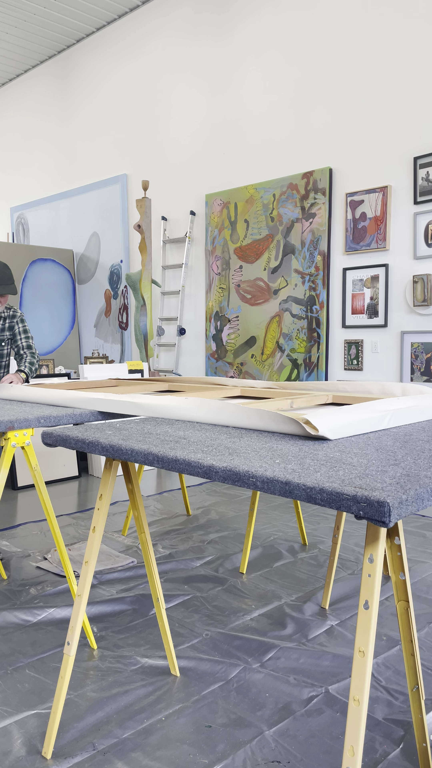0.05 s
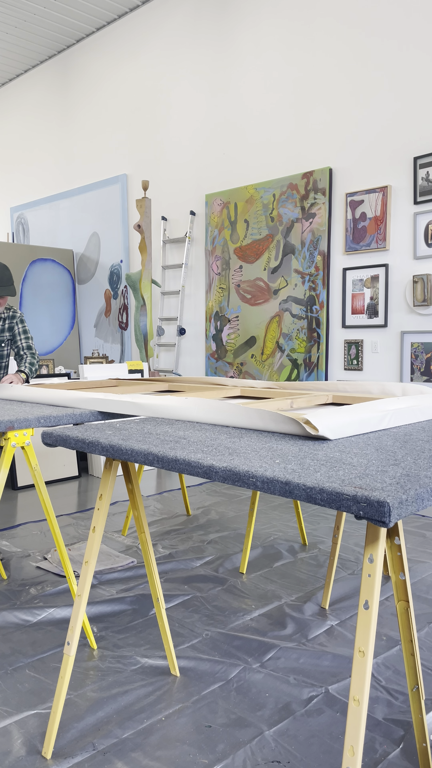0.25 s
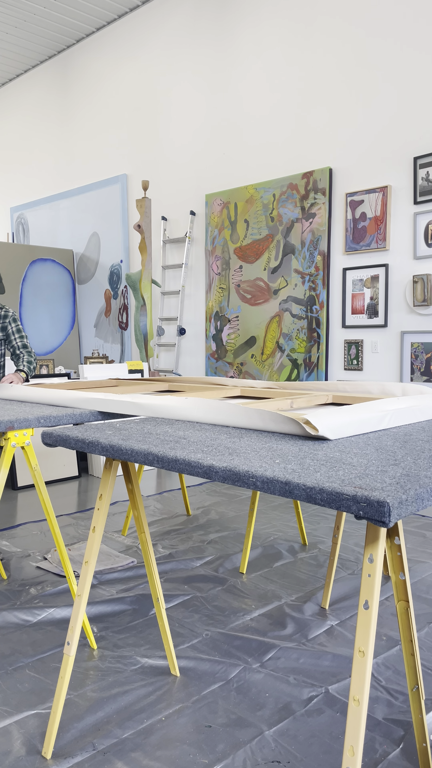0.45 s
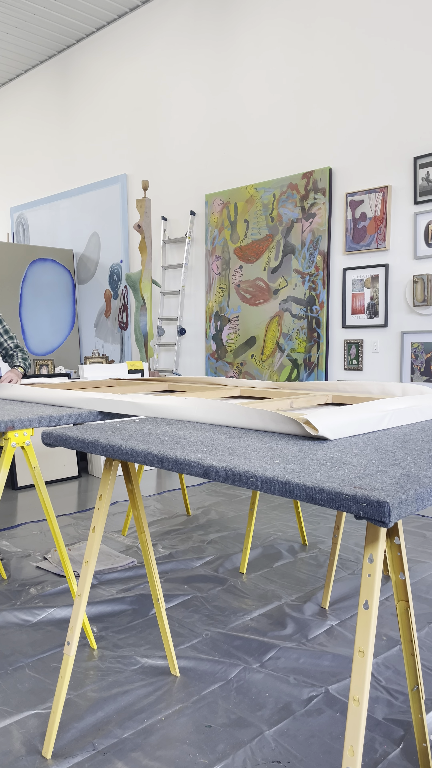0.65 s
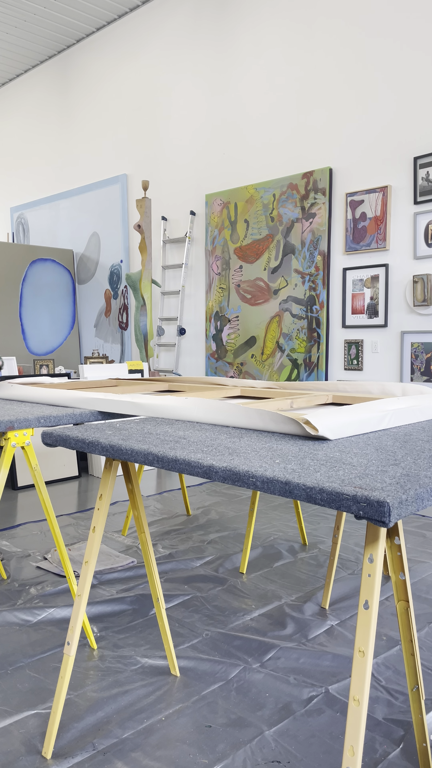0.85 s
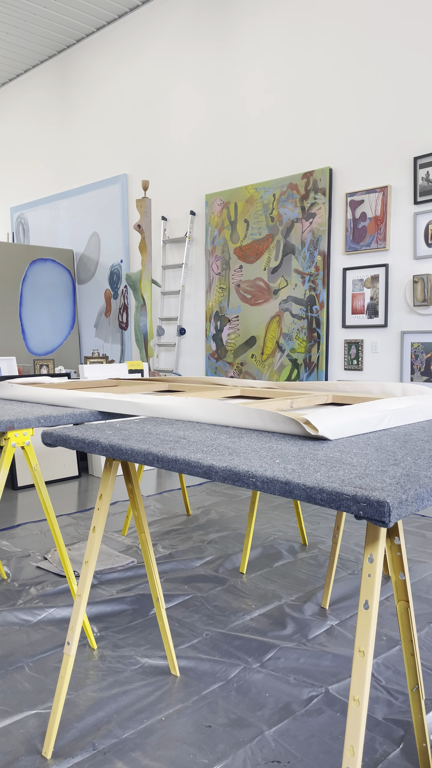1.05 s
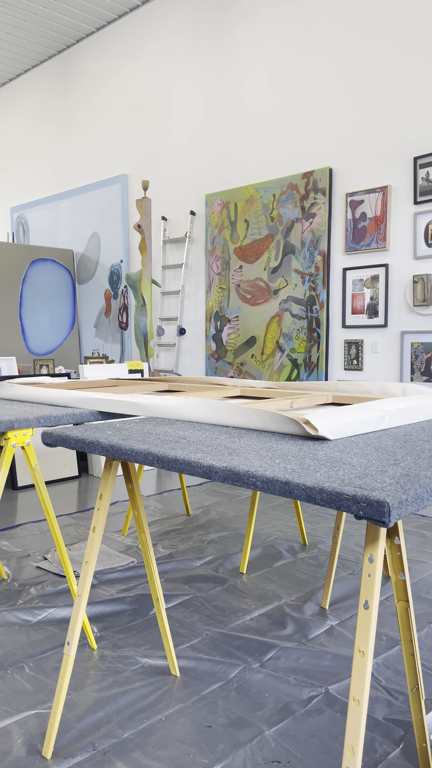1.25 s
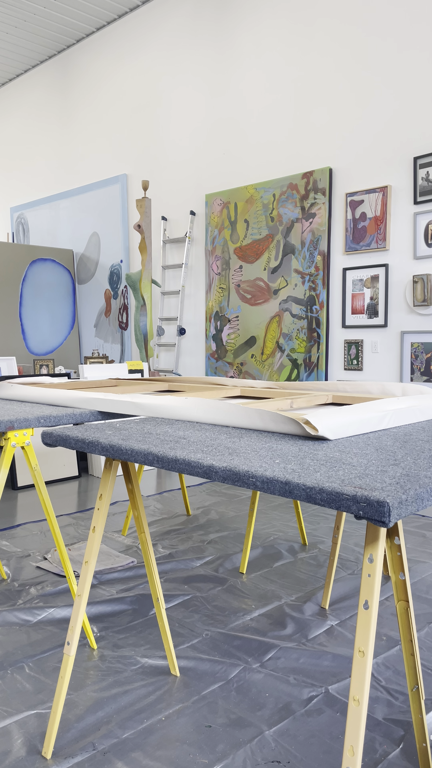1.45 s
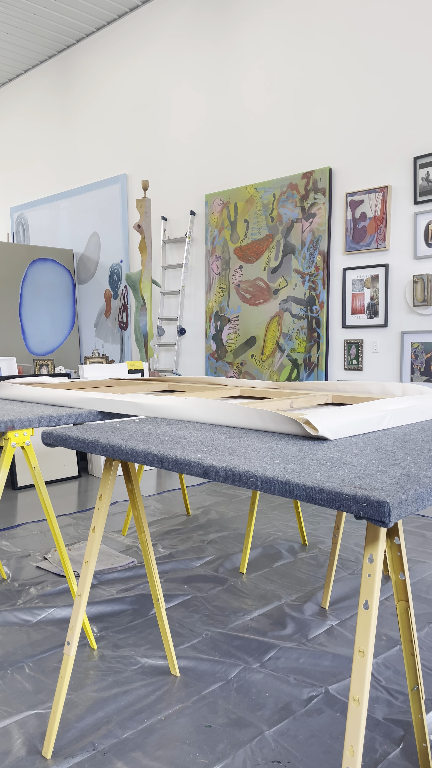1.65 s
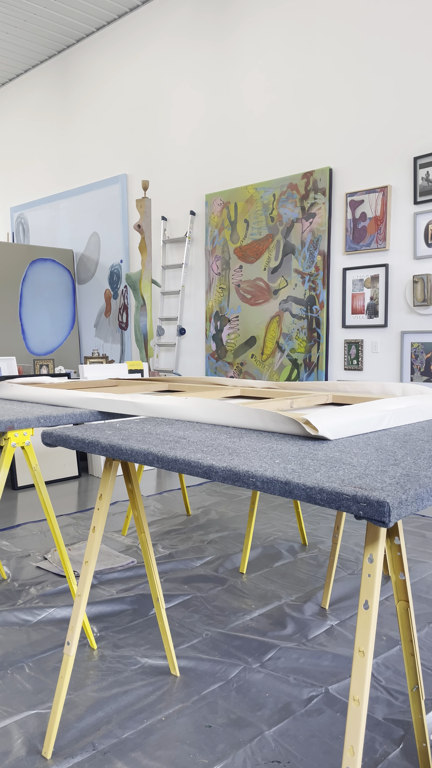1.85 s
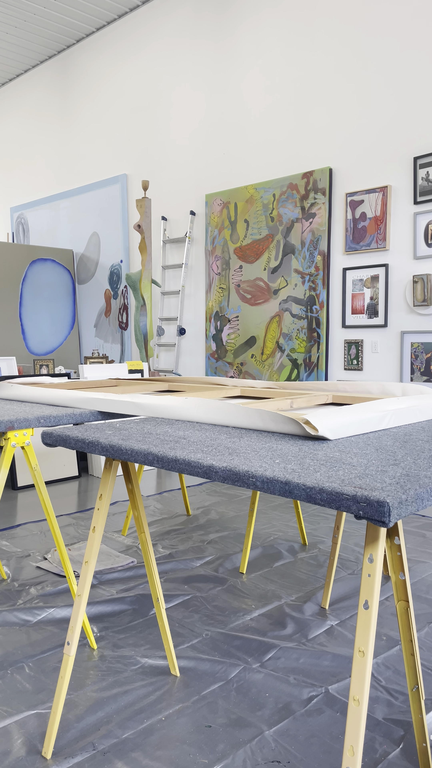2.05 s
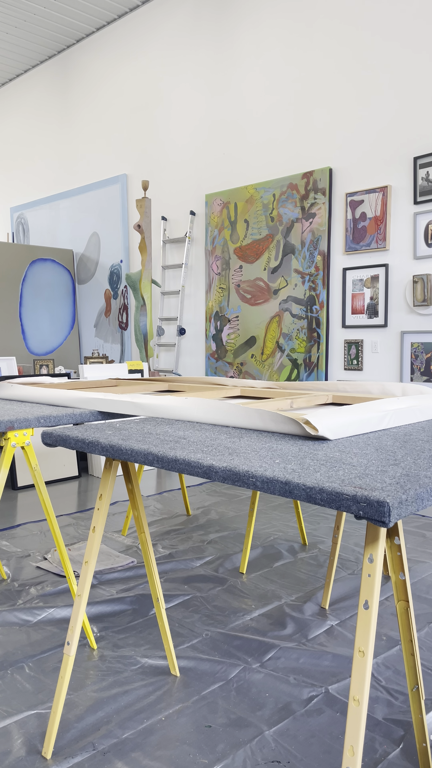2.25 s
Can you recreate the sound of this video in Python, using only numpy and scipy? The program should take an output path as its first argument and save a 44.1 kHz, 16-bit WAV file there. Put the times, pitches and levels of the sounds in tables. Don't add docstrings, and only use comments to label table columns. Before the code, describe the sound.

A staple gun fires into a stretched canvas frame at 0.2 seconds: quick latch clicks, then a hard steel crack with a short woody boom. A large reverberant studio rings for about a second, over the low fading rumble of an earlier knock. Faint tool taps come at 1.05, 1.35 and 1.55, with a slight creak near 1.5, cloth rustles and shuffling feet. A click and soft set-down land at 2.14, over quiet ventilation hum.

```python
import sys
import numpy as np
from scipy import signal
from scipy.fft import rfft, irfft
from scipy.io import wavfile
from scipy.ndimage import uniform_filter1d

SR = 44100
rng = np.random.default_rng(int(sys.argv[2]) if len(sys.argv) > 2 else 0)


def store_wav(level_fs):
    pcm = np.round(np.clip(np.atleast_2d(level_fs), -1, 1) * 32767)
    wavfile.write(sys.argv[1], SR, pcm.T.astype(np.int16))


def ratio(d):
    e = np.asarray(d, float) / 20
    return 10 ** e


N = 101429
T = np.arange(N) / SR
SIZE = 131072
HZ = np.fft.rfftfreq(SIZE, 1 / SR)

# start_s, crack_db, wood_db
BLOWS = [
    (.2214, -22, -1.5),
    (.2226, -8, -4),
    (.2237, -12, -7),
    (.2253, -17, -4),
    (.2263, -18, -3),
    (.2280, -32, -3),
]
# start_s, crack_db, wood_db, room_db, tilt_db_per_octave
TAPS = [
    (1.0461, -47, -42, -47, -2),
    (1.0765, -54, -58, -50, -4),
    (1.349, -66, -62, -56.5, 0.1),
    (1.5514, -45, -64, -60, 2.5),
    (2.139, -51, -58, -46, -2.5),
    (2.1436, -37, -50, -56, -2.5),
]


def by_hz(table):
    hz, value = np.array(table).T
    return np.interp(np.log(HZ + 1), np.log(hz), value)


def shape(x, gain):
    return irfft(rfft(x, SIZE) * gain, SIZE)[..., :N]


def unit(x):
    return x / np.sqrt(np.mean(x ** 2))


def coloured_pair(gain):
    return unit(shape(rng.standard_normal((2, N)), gain))


def walk(rate_hz):
    hold = int(SR / rate_hz)
    steps = np.repeat(rng.standard_normal(N // hold + 1), hold)
    return 1.3 * uniform_filter1d(uniform_filter1d(steps, hold), hold)[:N]


def ring(times, dbs, modes, scatter_db=3.0, detune=.02, size=5000):
    push_s = .0005
    out = np.zeros(N + size)
    t = np.arange(size)[:, None] / SR
    hz, db, t60 = np.array(modes).T
    chance = rng.standard_normal((len(times), 2, len(hz)))
    for start_s, level_db, (strength, pitch) in zip(times, dbs, chance):
        decay = ratio(db + scatter_db * strength - 60 * t / t60)
        tone = np.sin(2 * np.pi * hz * (1 + detune * pitch) * t)
        bell = decay * tone * (1 - np.exp(-t / push_s))
        start = int(start_s * SR)
        out[start:start + size] += ratio(level_db) * bell.sum(axis=1) / 2
    return out[:N]


def crack(times, dbs, colour, t60):
    age = T - np.array(times)[:, None]
    decay = ratio(np.array(dbs)[:, None] - 60 * np.abs(age) / t60)
    bursts = decay * np.clip(age / .0004, 0, 1)
    return coloured_pair(ratio(by_hz(colour)))[0] * bursts.sum(axis=0)


def stapler():
    # start_s, level_db, pitch_hz
    latch = [
        (0.209, -23, 10000),
        (.2148, -19, 5000),
        (.2180, -18, 10800),
    ]
    # pitch_hz, level_db
    steel = [(600, -28), (1800, -12), (3200, 0.5), (5000, -6.5), (7000, -3), (8800, -2.5), (11000, -0.5),
             (13500, -5), (16500, -8)]
    # pitch_hz, level_db, t60_s
    wood_modes = [(218.7, -20, .12), (319.2, -17, .08), (407, -11, .03), (521, -16, .07), (752, 0.2, .013),
                  (1025, -1.5, .015), (1190, -6, 0.0084)]
    # pitch_hz, level_db, t60_s
    studio_modes = [(219, -27, .6), (249, -32, .5), (320, -30, .5), (524, -27, .5), (562, -33, .5),
                    (664, -32, .5), (867, -34, .5), (1040, -31, .5), (1208, -35, .6)]
    thump_modes = [(hz, 0, .1) for hz in (120, 170, 220)]

    clicks = np.zeros(N)
    for start_s, level_db, hz in latch:
        click_modes = [(hz, 0, .007), (hz * 0.48, -8, .006), (900, -4, .015)]
        clicks = clicks + ring([start_s], [level_db], click_modes)
    latch_s, latch_db = np.array(latch).T[:2]
    rattle = crack(latch_s, latch_db - 11.0, steel, .018)

    blow_s, crack_db, wood_db = np.array(BLOWS).T
    slam = crack(blow_s, crack_db, steel, .006)
    radiated = (1j * HZ / (150 + 1j * HZ)) ** 2
    wood = shape(ring(blow_s, wood_db, wood_modes), radiated)
    thump = ring(blow_s[:1] + .018, [-30], thump_modes, scatter_db=4)
    boom = ring(blow_s[:1] + .012, [0], studio_modes, scatter_db=0, detune=0, size=30000)
    return clicks + rattle + slam + wood + thump + boom


def taps():
    # pitch_hz, level_db, t60_s
    tool_modes = [(150, -6, .07), (330, -5, .05), (490, 0, .035), (900, -6, .025), (1480, 0, .03),
                  (1980, -2, .025), (6200, 3, .008), (11800, -1, .008)]
    # pitch_hz, level_db
    tick = [(500, -14), (1500, -2), (3500, -2.5), (6500, -3), (9000, -2), (12000, 2), (14000, -6),
            (16500, -20)]
    # start_s, level_db
    thuds = [
        (2.139, -50),
        (2.152, -58),
        (2.166, -57),
        (2.188, -55),
    ]
    # pitch_hz, level_db, t60_s
    table_modes = [(95, -9, .08), (150, 0.1, .06), (230, -1, .05), (340, -3, .04)]

    ticks = np.zeros(N)
    for start_s, crack_db, _, _, tilt_db in TAPS:
        colour = [(hz, db + tilt_db * np.log2(hz / 5000)) for hz, db in tick]
        ticks = ticks + crack([start_s], [crack_db], colour, .009)
    tap_s, _, wood_db = np.array(TAPS).T[:3]
    knocks = ring(tap_s, wood_db, tool_modes, scatter_db=1.5)
    thud_s, thud_db = np.array(thuds).T
    return ticks + knocks + ring(thud_s, thud_db, table_modes, scatter_db=2.5)


def scuffs():
    # start_s, level_db, centre_hz, width_octaves, fade_s (per
    # 60 dB)
    moves = [(.86, -77, 10500, .2, 1.5), (1.048, -65, 6000, 1.2, 0.15), (1.13, -71, 3930, 1.16, 0.5),
             (1.355, -72, 9000, .4, 3.0), (1.36, -59, 275, 1, 2.5), (1.4, -63.5, 136, .3, 1),
             (1.5, -63, 800, 0.99, 3.5), (1.553, -70, 1900, .2, 1.0), (1.553, -69.5, 9200, 0.72, 2.5),
             (1.53, -74, 3400, .25, 3.0), (1.62, -72, 3000, .7, 4.0), (1.695, -63, 7000, .7, 2.0),
             (1.74, -69, 2400, .9, 5.0), (2.145, -62.5, 3600, .8, 4), (2.145, -66, 9990, .45, 1.4),
             (2.139, -58, 220, .7, .5), (2.22, -64, 800, .8, 3.0), (.197, -62, 5100, .04, .15),
             (1.44, -79, 2650, .06, .8), (1.51, -71, 3300, .05, .8), (1.562, -68, 1500, .08, .4),
             (1.56, -70, 800, .08, 1.5)]
    out = np.zeros((2, N))
    for start_s, level_db, centre_hz, octaves, fade_s in moves:
        distance = np.log2((HZ + 1) / centre_hz) / octaves
        grain = coloured_pair(np.exp(-distance ** 2 / 2))
        age = T - start_s
        level = ratio(level_db - 60 * np.abs(age) / fade_s + 1.1 * walk(35))
        out = out + grain * level * np.clip(age / .01, 0, 1)
    return out


def creak():
    # pitch_hz, width_hz, level_db
    bands = [(1440, 100, 15), (1090, 70, -0.5), (805, 60, 9.5), (3300, 220, -23)]
    start_s, hold_s, level_db = 1.48, .05, -65
    gain = sum(ratio(db) / (1 + ((HZ - hz) / width) ** 2) for hz, width, db in bands)
    age = T - start_s
    fade = ratio(level_db - 60 * np.clip(age - hold_s, 0, 9) / .5)
    return coloured_pair(gain) * fade * np.clip(age / .009, 0, 1)


def earlier_knock():
    # pitch_hz, level_db
    colour = [(18, -37.5), (45, -5), (151, -2.5), (270, -8), (347, -4), (481, -16.5), (1140, -36.5),
              (1240, -35.5), (2500, -56), (3900, -80), (6600, -95)]
    level_db, t60_s = -37.5, .91
    fade = ratio(level_db - 60 * T / t60_s + 1.1 * walk(30))
    return coloured_pair(ratio(by_hz(colour))) * fade * np.clip(T / .0015, 0, 1)


def ventilation():
    # pitch_hz, level_db
    colour = [(25, -2), (45, 3), (110, -4), (300, -7), (900, -6), (1400, -14), (2500, -29), (9000, -48),
              (16000, -80)]
    air = coloured_pair(ratio(by_hz(colour))) * ratio(-64.5 + 0.99 * walk(5.2))
    hum_hz, width_hz = 79, 12
    phase = 2 * np.pi * np.cumsum(hum_hz + .8 * walk(5)) / SR
    hum = 1.6 * np.sin(phase) * ratio(-64 + 0.8 * walk(8))
    resonance = 1 / (1 + ((HZ - hum_hz) / width_hz) ** 2)
    rumble = unit(shape(rng.standard_normal(N), resonance)) * ratio(-71)
    return air + (hum + rumble) * [[1], [0]]


def room(direct, times, dbs):
    # pitch_hz, t60_s
    ring_times = [(60, 1.3), (100, 1.3), (200, .95), (400, 1.02), (1500, 1.22), (3000, 1.17), (5000, 1.02),
                  (9000, .66), (12000, .36), (16000, .3)]
    # pitch_hz, level_db
    tail_colour = [(40, -30), (110, -8), (220, 1), (380, -1.5), (560, 1.5), (1200, -3), (1350, -13),
                   (2500, -8.5), (7000, -11), (8000, -15), (12500, -12), (15000, -18), (15700, -50)]
    # delay_s, level_db
    walls = [
        (0.011, -13),
        (0.0169, -8),
        (.027, -9.5),
        (0.0353, -7),
    ]

    t60, colour = by_hz(ring_times), ratio(by_hz(tail_colour))
    white = rfft(rng.standard_normal((2, SIZE)))
    tail = np.zeros((2, N))
    for hz in 40 * 2 ** np.arange(0, 9, .5):
        octaves = np.log2((HZ + 1) / hz)
        band = np.cos(np.pi / 2 * np.clip(2 * octaves, -1, 1)) ** 2
        rise = np.clip((T - .005) / (.017 + 2.5 / hz), 0, 1)
        fade = ratio(-60 * T / np.interp(hz, HZ, t60))
        tail = tail + irfft(white * band * colour, SIZE)[:, :N] * fade * rise
    tail = tail / np.sqrt(np.sum(tail ** 2) / 2)

    hits = np.zeros(N)
    hits[(np.array(times) * SR).astype(int)] = ratio(dbs)
    echoes = np.zeros((2, N))
    delay_s, echo_db = np.array(walls).T
    for side, stretch in enumerate((1, 1.04)):
        echoes[side, (delay_s * stretch * SR).astype(int)] = ratio(echo_db)
    wall_gain = rfft(echoes, SIZE) / (1 + (HZ / 15000) ** 24)
    return shape(hits, rfft(tail, SIZE)) + shape(direct, wall_gain)


def two_ports(direct, diffuse):
    # pitch_hz, likeness (0-1)
    likeness = [(60, .998), (150, .99), (400, .93), (640, .2), (1400, .35), (3100, .25), (4800, .2),
                (5300, .88), (6000, 0.45), (6800, .5), (9500, .985), (11000, .985), (15500, .92)]
    # pitch_hz, lead_rad
    port_phase = [(300, 0), (800, -.9), (2000, .3), (5500, 0.5), (7000, 1), (8500, 2.2), (9700, 2.75),
                  (10900, 3.45), (12500, 4.6), (15000, 6.1)]
    # pitch_hz, level_db
    balance = [(60, .4), (200, 2.0), (600, 1.0), (1500, 0), (3000, 0.56), (8000, -0.96), (14000, 1.2)]
    shared, other = diffuse
    like = np.clip(by_hz(likeness), 0, 1)
    lead = np.exp(-1j * by_hz(port_phase) * np.clip(HZ / 600, 0, 1))
    right = shape(direct, lead) + shape(shared, like * lead) + shape(other, np.sqrt(1 - like ** 2))
    tilt = ratio(by_hz(balance) / 2)
    return np.array([shape(direct + shared, tilt), shape(right, 1 / tilt)])


def scene():
    shot = stapler()
    touch = taps()
    hits = [(BLOWS[1][0], 18)] + [(row[0], row[3] + 20) for row in TAPS]
    hit_s, hit_db = np.array(hits).T
    reverb = room(shot + ratio(-6) * touch, hit_s, hit_db)
    diffuse = reverb + scuffs() + creak() + earlier_knock() + ventilation()
    return two_ports(shot + touch, diffuse)


def low_pass(x):
    return signal.sosfilt(signal.butter(12, 16520, fs=SR, output="sos"), x)


def record(dry):
    rounded = np.tanh(.5 * dry) / .5
    low_cut = signal.butter(2, 45, "high", fs=SR, output="sos")
    top_cut = signal.butter(6, 14500, fs=SR, output="sos")
    mix = signal.sosfilt(top_cut, signal.sosfilt(low_cut, rounded))
    return low_pass(mix)


dry = scene()
out = record(dry)
store_wav(out)
```